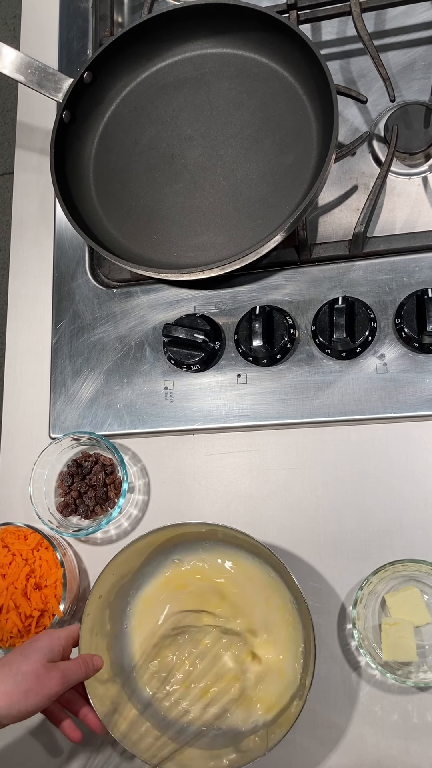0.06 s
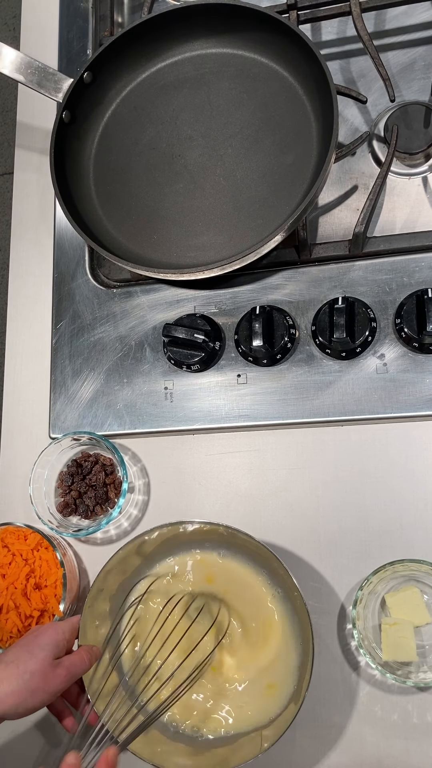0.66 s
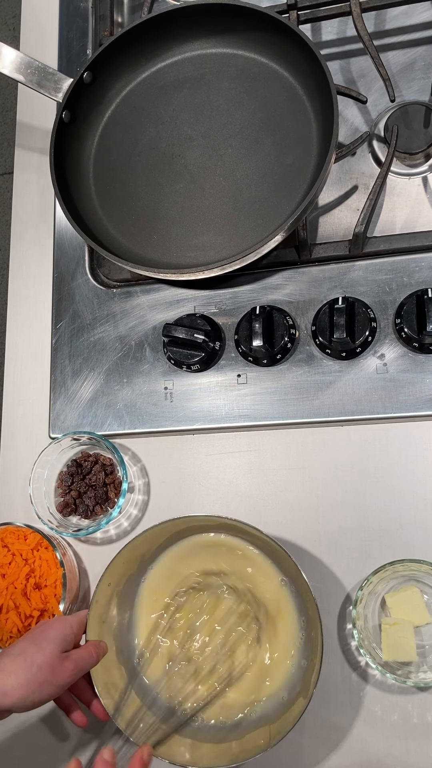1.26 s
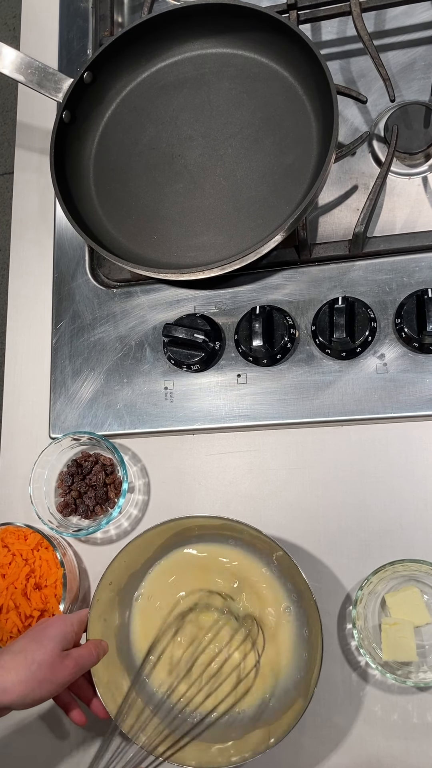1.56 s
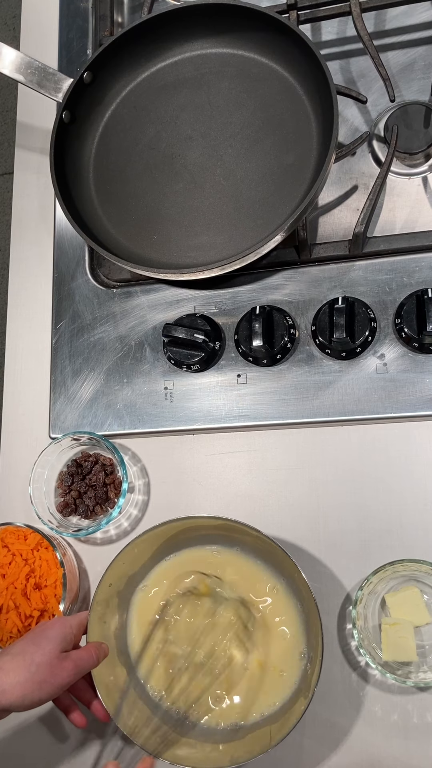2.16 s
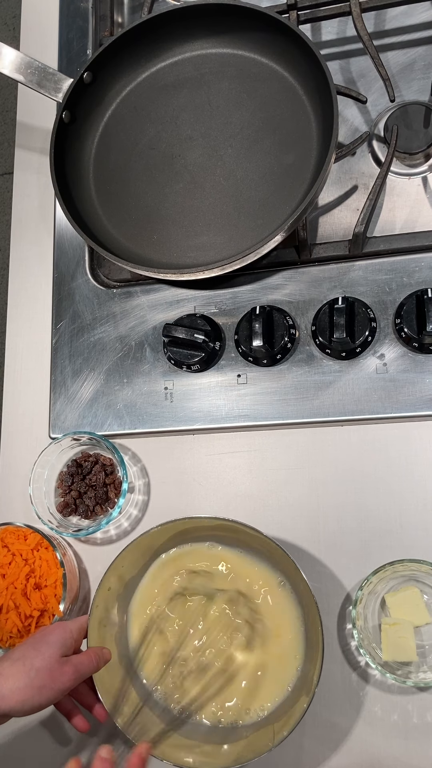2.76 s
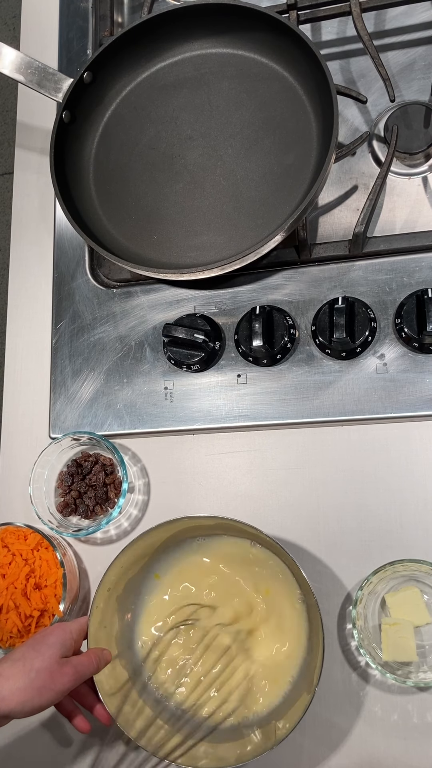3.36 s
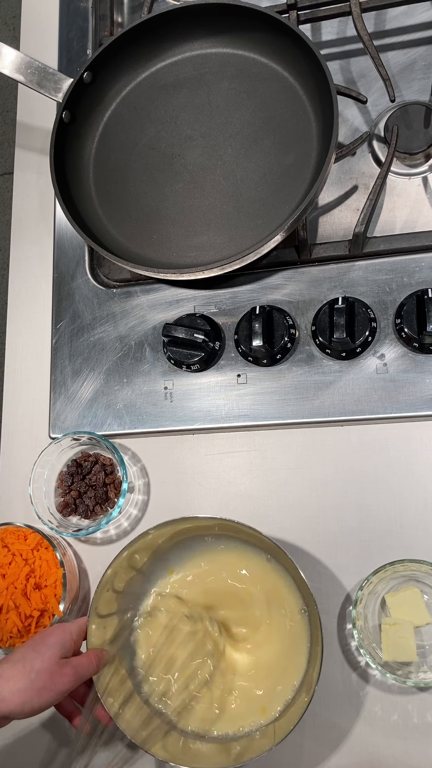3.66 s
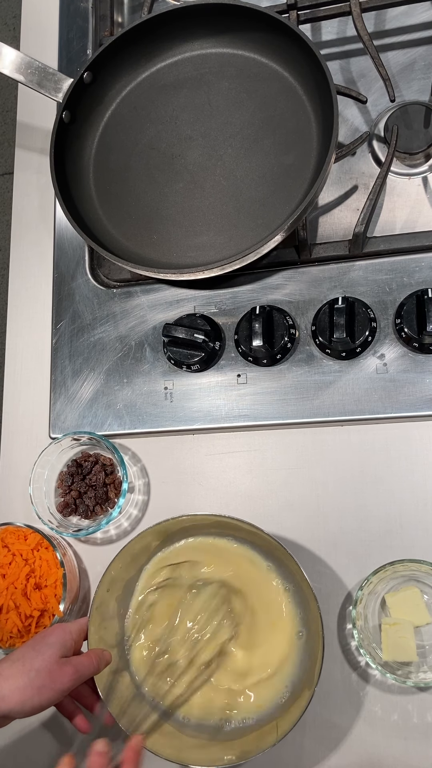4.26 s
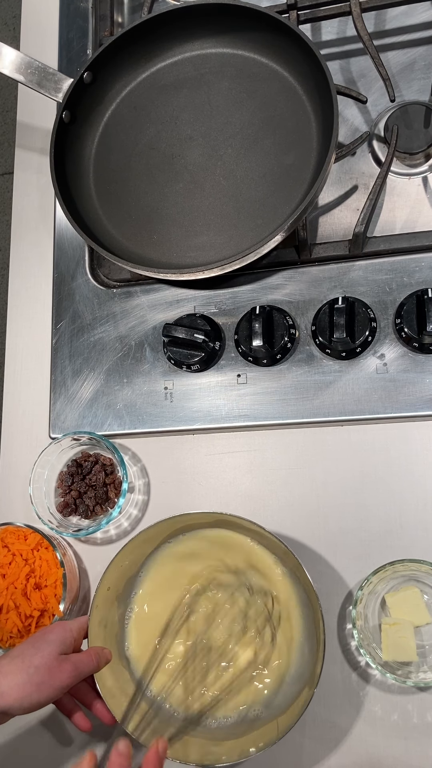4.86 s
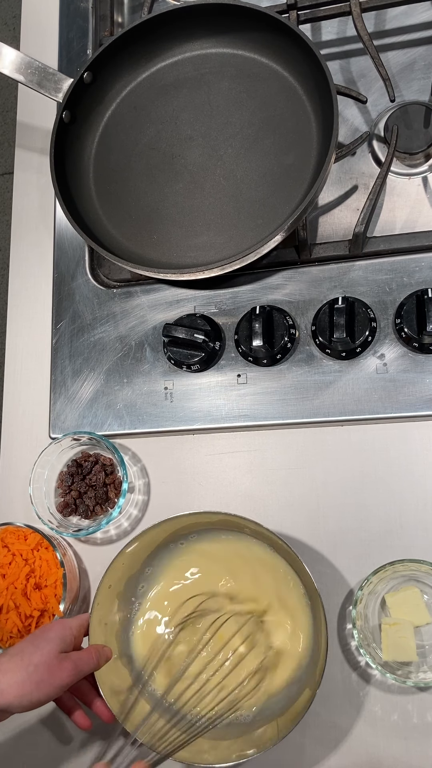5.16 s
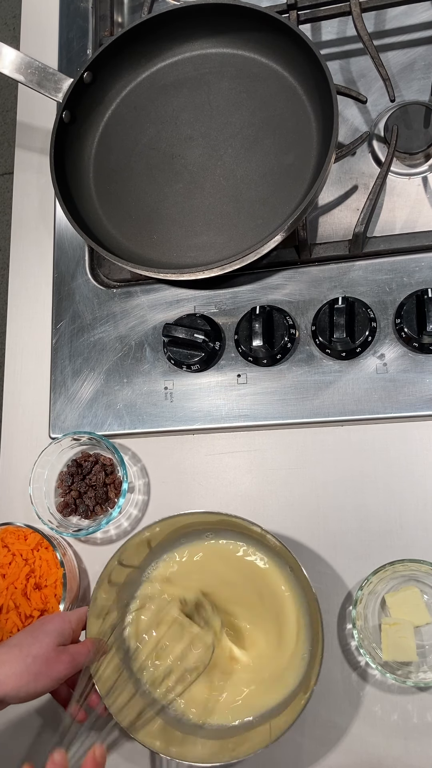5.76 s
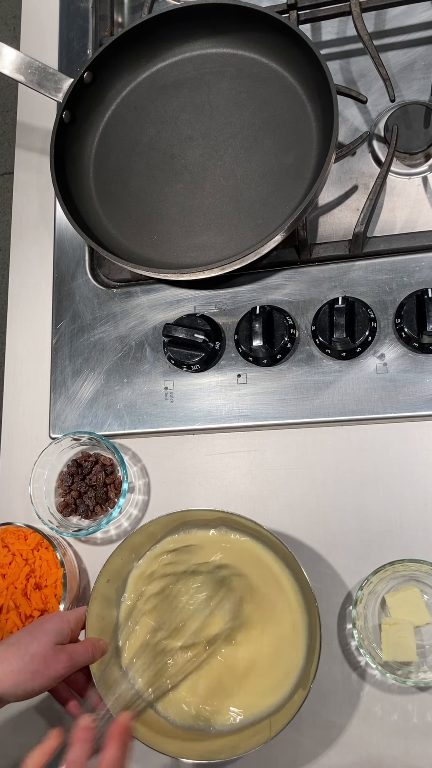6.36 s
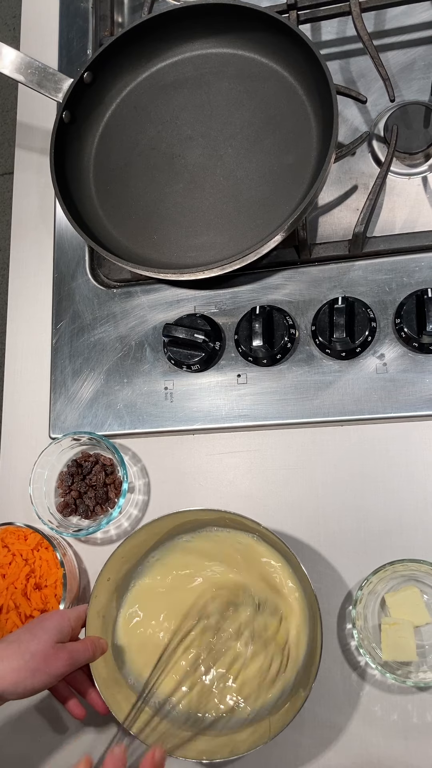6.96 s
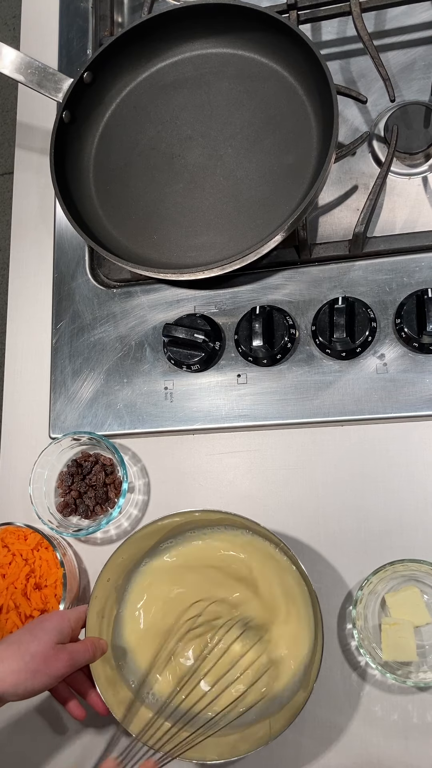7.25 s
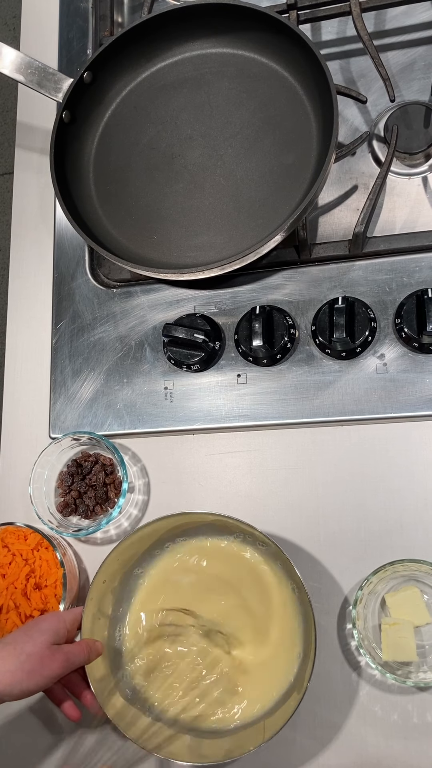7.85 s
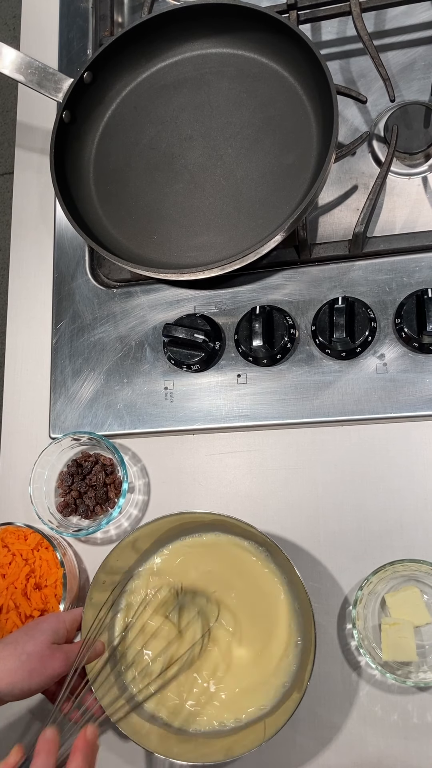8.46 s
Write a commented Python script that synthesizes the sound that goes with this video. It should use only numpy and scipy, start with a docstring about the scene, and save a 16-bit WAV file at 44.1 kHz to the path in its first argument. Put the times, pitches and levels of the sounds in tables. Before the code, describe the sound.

Whisk wires clatter rhythmically against a glass bowl as batter sloshes and bubbles, easing into lighter taps, then beating harder.

```python
"""A wire whisk in runny batter, in a glass bowl on a kitchen counter, close under a phone's two microphones.
Over a low room rumble the hand starts stirring, about four turns a second. On each turn the wires scrape
through the batter, which fizzes, gulps and bubbles, the bowl sings softly, and the wires clatter across
the glass. From about 1.5 s the whisk only taps the wall and the glass rings clear. Near 2.9 s it stirs
again, and from 5.3 s to the end it beats harder, squeezing chirps of air out of the batter."""
import sys
import numpy as np
from scipy import signal
from scipy.fft import rfft, irfft, next_fast_len
from scipy.io import wavfile
from scipy.ndimage import uniform_filter1d

SR = 44100
rng = np.random.default_rng(int(sys.argv[2]) if len(sys.argv) > 2 else 0)


def output_pcm(signal):
    """Save a mono or channel-first signal as 16-bit PCM at the path in sys.argv[1].

    Samples are clipped to [-1, 1] before scaling.
    """
    pcm = np.clip(np.atleast_2d(signal).T, -1, 1) * 32767
    wavfile.write(sys.argv[1], SR, np.round(pcm).astype(np.int16))


N = 379260
TIME = np.arange(N) / SR
TURN_S = .265  # the usual length of a turn
TAP_FROM_S, STIR_FROM_S, BEAT_FROM_S = 1.45, 2.86, 5.28  # where the hand changes its motion
TAPPING = (TIME > TAP_FROM_S) & (TIME < STIR_FROM_S)

# Levels in the tables are relative: each source adds its own gain.
# Spectra, from the room in to the wires. Each row: frequency in Hz, level in dB.
RUMBLE_SPECTRUM = [(20, -28), (33, -40), (45, -1.5), (65, 2), (82, 1), (140, 2), (165, -11.5), (235, -5.5),
                   (280, -11), (400, -14), (500, -22), (630, -18.5), (1100, -35), (5000, -62)]
RUMBLE_TREBLE = [(8000, -58), (12000, -70)]
ROOM_SPECTRUM = [(100, -40), (300, 13), (600, 7.5), (1500, 22), (2800, 15.5), (4100, 12.5), (5300, 3.5),
                 (7000, 5.5), (10000, 8.5), (12000, -45), (15000, -8)]  # the kitchen's reflections
SLOSH_SPECTRUM = [(50, -29), (100, -5), (140, 5.5), (170, 0.5), (230, 4), (290, -9), (400, -14), (520, -19),
                  (1200, -32.5)]  # heaving batter
FIZZ_SPECTRUM = [(100, -2), (240, 0), (480, -9), (900, -1.5), (1300, -24.5), (1750, -14), (2200, -20),
                 (2800, -15), (4000, -3.5), (7000, 1.5)]  # batter parted by the wires
FIZZ_TREBLE = [(10000, -12), (12000, -30)]
SNAP_SPECTRUM = [(700, -21), (1500, -4.5), (4200, 7), (7000, -1)]  # a bubble's film tearing
SING_SPECTRUM = [(650, -59), (800, -1.5), (880, -2), (950, -4), (1150, -49)]  # the bowl's singing mode, rubbed unevenly
KNOCK_SPECTRUM = [(60, 9.5), (200, 9), (350, -8), (500, -34), (630, 5), (760, 6), (900, 10.5), (1150, 1.5),
                  (1450, 1), (1750, -30), (2100, -12.5), (2800, -8), (5000, -6.5)]  # the struck bowl
RUB_SPECTRUM = [(1500, -40), (2700, -33), (3300, 8), (3650, 4.5), (4050, -22), (4700, 4), (5500, -14)]  # wires stirred along the glass
WIRE_SPECTRUM = [(1200, -72), (2700, -31.5), (3500, -20), (4400, -14.5), (4900, -3), (5500, -6.5),
                 (7100, -6.5), (8000, 2), (10000, 0), (11000, -0.5)]  # wires struck and scraped
WIRE_TREBLE = [(11900, -23), (12700, -7), (13400, -6.5), (14000, -9.5), (15700, -11)]
# How far the left microphone leads the right. Each row: frequency in Hz, phase in radians.
MIC_PHASE_LEAD = [(0, 0), (300, -.2), (700, -1.2), (1100, -.7), (1400, .3), (1800, .5), (2600, 2),
                  (4000, 1.6), (4900, 3.1), (5450, 3.2), (8600, 6.25), (11900, 9.43), (14600, 12.5),
                  (16000, 12.7)]

# Drag of the wires from one hit to the next. Each row: share of the turn from 0 to 1, level in dB.
STIR_DRAG = [(0, -33), (.4, -41), (.7, -34.5), (1, -31.5)]  # slack in the middle of the bowl, then climbing the wall
TAP_DRAG = [(0, -45), (.38, -35), (.78, -61), (1, -61)]  # a dip into the batter, then through the air
BEAT_DRAG = [(0, -29.5), (.22, -37), (0.497, -38), (0.699, -44), (1.001, -29)]  # ploughing on, then a brief lift before the next hit

# Air pockets opening behind the whisk. Each row: start in seconds, final pitch in Hz, level in dB.
AIR_POCKETS = [(0.197, 240, -39), (0.409, 253, -41), (0.418, 201, -34.5), (1.229, 237.6, -37),
               (1.4397, 181, -34.5), (1.466, 179, -42), (3.731, 240, -37.5), (4.06, 247, -35),
               (4.785, 223, -35.5), (6.865, 201, -35), (6.9486, 227, -30.5), (7.469, 232, -31.5),
               (7.7825, 215, -28), (8.208, 242, -35.5), (8.585, 242, -43)]
# The loudest bubbles. Each row: start in seconds, pitch in Hz, level in dB, life in seconds,
# rise in octaves per second.
BIG_BUBBLES = [(.818, 1480, -46.5, 0.0046, 24), (.946, 2060, -54, .004, -1), (4.559, 3800, -50, .003, 4),
               (4.573, 1253, -45.5, 0.0091, -1.5), (4.861, 3940, -39.5, 0.0024, 12),
               (5.009, 3430, -34.5, 0.0017, 12), (5.304, 2056, -35.5, 0.0039, 8.5),
               (5.499, 3720, -43.5, 0.0027, 3), (5.566, 1970, -39.5, 0.0037, 19),
               (5.678, 2190, -34.5, 0.0015, 14), (5.9, 3380, -31, 0.0016, 16),
               (6.401, 2133, -45, 0.002, 11), (6.439, 1840, -47, 0.0038, 0.5),
               (6.523, 3660, -32.5, 0.0015, 3), (6.741, 3380, -50, 0.0016, 2),
               (6.769, 3257, -43, 0.0019, 2), (6.9393, 3370, -32, .0014, 8),
               (7.013, 1520, -40.5, 0.0045, 18), (7.194, 3820, -39, 0.0019, 8),
               (7.475, 3280, -32, 0.0016, 6), (7.545, 2030, -40, 0.0023, 10),
               (7.561, 2030, -28, 0.0013, 32), (7.565, 1140, -37.5, 0.0046, 7),
               (8.122, 3200, -42, 0.0012, 2), (8.562, 3700, -44, 0.0013, 2)]
# Furrows closing in the batter. Each row: start and length in seconds, first and last pitch in Hz,
# level of a bubble in dB.
FURROWS = [(0.14, .025, 1345, 1890, -61), (0.782, .06, 890, 2260, -50), (1.143, 0.027, 1190, 1960, -55),
           (5.251, 0.045, 836, 2100, -46.5), (5.534, 0.033, 1400, 1986, -53),
           (6.073, 0.032, 1030, 1430, -45), (6.395, .015, 2300, 3120, -46.5),
           (7.113, 0.031, 920, 1539, -46), (7.343, .012, 1770, 2230, -51), (7.386, .012, 1930, 3330, -43),
           (7.558, 0.016, 1430, 3150, -46), (7.612, 0.023, 1920, 2290, -47)]

# Turns in which the wires catch the glass and it sings out. Each row: crest in seconds, level in dB,
# pitch in Hz, half length in seconds.
BOWL_NOTES = [(0.03, -41, 880, 0.024), (1.078, -45.5, 883, 0.028), (3.09, -59, 870, 0.018),
              (3.588, -52, 888, 0.038), (4.396, -31, 890, 0.011), (4.646, -44.5, 867, 0.022),
              (4.933, -44, 889, 0.035), (5.421, -43, 899, 0.0086), (5.7, -37, 883, 0.019),
              (6.478, -45, 896, 0.022), (6.738, -50, 890, 0.031), (7.266, -52, 894, 0.029),
              (7.538, -32, 867, 0.0071), (7.826, -49, 904, 0.025)]
# Resonances. Each row: frequency in Hz, level in dB, time to fall 60 dB in seconds.
TAPPED_GLASS_MODES = [(815, -2, .07), (885, 2, .09), (975, 1, .06), (1420, -8, .06), (1900, -9, .07),
                      (3900, -10, .06), (4400, -11, .06)]  # the wall tapped above the batter
WIRE_AND_BOWL_MODES = [(647, -20.5, 0.15), (818, -19.5, 0.092), (1420, -20.5, 0.28), (1890, -43, 0.15),
                       (2100, -21, 0.21), (3317, -13.5, 0.052), (3990, -8, .05), (6350, -5.5, .06),
                       (7210, 1, 0.11), (7740, 1, 0.22), (8070, 4.5, 0.21), (8370, -2, 0.19),
                       (8590, 4, 0.13), (9030, 3.5, 0.15), (9380, -3.5, 0.24), (9660, 1, 0.22),
                       (9380, -1, 0.084), (9800, 3, .14)]  # both ringing on after a contact
CLACK_MODES = [(617, -9.5, 0.052), (882, -2, 0.044), (1420, -9, 0.036), (1907, -11.5, 0.043),
               (3310, -0.5, 0.029), (3890, -7, 0.032), (4400, -6, 0.035), (5000, -8, 0.064)]  # the leading wire on the glass
# The wires' lower resonances, heard as wet ticks. Each row: frequency in Hz, level in dB.
TICK_MODES = [(1500, -4), (2150, -18), (3350, 1), (3900, 2), (4100, -11), (4500, -11), (4950, 14.5),
              (6300, 13)]

# A wire lands squarely on the glass. Each row: start in seconds, level in dB, pitch in Hz.
WIRE_CLINKS = [(0.176, -29, 3980), (0.4085, -26.5, 3940), (0.6776, -31, 3800), (0.918, -29.5, 3850),
               (2.4676, -30.5, 4050), (3.2066, -37, 4056), (3.464, -33, 3800), (3.713, -33, 4050),
               (3.9838, -43, 3900), (4.229, -32, 3750), (4.2444, -27, 3920), (4.4912, -29.5, 3350),
               (4.5031, -29, 4040), (4.5121, -29.5, 3890), (4.7846, -31, 3560), (6.6021, -30, 4050),
               (7.669, -31, 4300)]
# The wires bite and skid. Each row: middle in seconds, level in dB, half length in seconds.
WIRE_SKIDS = [(0.345, -35.5, .015), (0.601, -36, .028), (0.663, -32, .011), (0.868, -29, .01),
              (0.903, -32, .01), (1.069, -35, .018), (1.162, -30, .01), (1.301, -36, .006),
              (2.334, -34.5, .014), (3.074, -38, .009), (3.366, -32, .008), (3.641, -31, .008),
              (3.68, -34, .02), (3.833, -39, .012), (4.171, -37, .012), (4.434, -38, .014),
              (5.135, -37, .014), (5.201, -35, .02), (5.427, -36.5, .009), (5.501, -34, .006),
              (5.657, -37.5, .01), (5.952, -38, .015), (6.205, -36.5, .016), (6.312, -33, .008),
              (7.099, -31, .016), (7.191, -33, 0.0055), (7.454, -35, .012), (8.07, -36, .014)]
# One wire flicks the glass. Each row: start in seconds, level in dB, fade in seconds,
# the bowl's knock against that level in dB.
WIRE_FLICKS = [(0.097, -33.5, .002, -32), (0.1632, -22.5, .003, -28), (1.145, -26.5, .005, -18),
               (1.387, -29.5, .005, -31), (1.674, -18, .002, -10.5), (1.6791, -16, .0016, -22),
               (1.732, -27, .003, -28), (1.9143, -29, .002, -22), (2.6788, -22, .002, -33),
               (2.947, -30, .008, -9.5), (3.132, -28.5, .005, -39), (3.214, -25, 0.0017, -33),
               (3.243, -25, .003, -14), (3.616, -32.5, .003, -33), (3.903, -31, .004, -32),
               (3.934, -29, .004, -38), (4.393, -30, .006, -28), (4.504, -22.5, .003, -20),
               (4.513, -26, .002, -16), (5.2334, -23, .003, -24), (5.332, -31, .003, -5),
               (5.9, -31.5, .002, -25), (6.05, -26.5, .005, -35), (6.169, -32, .003, -22),
               (6.417, -29, .002, -11), (6.485, -31, .005, -14), (6.555, -26, .004, -17),
               (6.72, -31, .003, -15), (6.753, -33, .002, -25), (6.803, -31.5, .003, -9),
               (6.851, -27, .002, -30), (6.998, -29, .0012, -8), (7.06, -35, .002, -9),
               (7.1402, -24, .003, -12), (7.269, -30.5, .003, -8), (7.345, -25, .006, -9.5),
               (7.3905, -23, 0.0076, -20), (7.519, -32, .002, -8), (7.616, -23, .005, -13),
               (7.803, -31, .002, -24), (8.284, -30, .003, -13), (8.33, -26.5, .003, -27),
               (8.4813, -23.5, .003, -19)]
# The hit on the wall that ends each turn. Each row: time in seconds, level in dB, length of the clatter
# in seconds, the bowl's knock against the wires in dB, share of the first blow from 0 to 1,
# extra drag on the way there in dB, heave of the batter afterwards in dB.
WALL_HITS = [(0.1756, -24.5, 0.011, -18, 0.5, 0, -48), (0.4081, -22, 0.014, -12.5, 0.25, -1, -43),
             (0.6775, -21.5, 0.012, -13.5, 0.6, 0, -55), (0.9148, -20.5, 0.011, -20, 0.36, 1, -44),
             (1.1812, -23.5, 0.015, -23, 0.5, 0, -55), (1.438, -29.5, 0.0087, -41, 0.5, 0.5, -66),
             (1.6685, -20.5, 0.007, -21.5, 0.5, -24.5, -44), (1.8987, -23, 0.005, -19.5, 0.8, 0.5, -48),
             (2.0881, -21.5, 0.007, -33, 0.44, -14, -55), (2.2668, -21, 0.01, -20.5, 0.35, -2, -41),
             (2.4677, -20, 0.016, -21, 0.16, 1.5, -47), (2.6659, -18.5, 0.008, -25.5, 0.57, -1.5, -42),
             (2.8455, -26.5, 0.011, -17.5, 0.3, 1, -64), (3.2034, -20.5, 0.023, -15.5, 0.12, 0, -48),
             (3.4702, -23.5, 0.01, -11, 0.4, 1, -39), (3.7105, -16.5, 0.015, -18, 0.6, 1, -43),
             (3.982, -20.5, 0.027, -12, 0.25, 1, -37.5), (4.2302, -18.5, 0.027, -15.5, 0.3, 0, -44),
             (4.4911, -20.5, 0.022, -10.5, 0.2, -1, -38), (4.7826, -19, 0.02, -16, 0.18, -2.5, -49),
             (5.0334, -20.5, 0.032, -17, 0.3, -4, -43), (5.2751, -20, 0.024, -16, 0.17, 1.5, -44),
             (5.552, -20.5, 0.024, -30, 0.4, 0.5, -48), (5.8006, -20, 0.015, -17, 0.3, 0.5, -62),
             (6.063, -18.5, 0.029, -13.5, 0.1, 1, -48), (6.3323, -17.5, 0.019, -16, 0.3, 1, -46),
             (6.6002, -18.5, 0.02, -12.5, 0.19, -1, -49), (6.8574, -19, 0.021, -14, 0.26, 0, -39.5),
             (7.1246, -18.5, 0.013, -15.5, 0.6, 1, -39), (7.401, -19, 0.022, -14.5, 0.42, 1, -43),
             (7.669, -16, 0.022, -14.5, 0.3, 1, -42), (7.9432, -20, 0.017, -25, 0.25, -1, -60),
             (8.235, -26.5, 0.018, -24, 0.2, 0, -61), (8.4934, -23, 0.012, -13.5, 0.5, -1.5, -51)]


def undb(db):
    """Decibels to gain."""
    return 10 ** (np.asarray(db) / 20)


def unit(x):
    """Scale to an rms of one."""
    return x / np.sqrt(np.mean(x ** 2))


def add(track, s, sound):
    """Mix a sound into a track from time s on."""
    start = max(int(s * SR), 0)
    track[start:start + len(sound)] += sound[:N - start]


def colour(x, points):
    """Filter by a spectrum of (Hz, dB) points; white noise keeps its power."""
    hz, db = np.transpose(points)
    size = next_fast_len(x.shape[-1] + 4096)
    bins = np.maximum(np.fft.rfftfreq(size, 1 / SR), 1)
    gain = unit(undb(np.interp(np.log(bins), np.log(hz), db)))
    return irfft(rfft(x, size) * gain, size)[..., :x.shape[-1]]


def walk(rate):
    """Random levels held 1 / rate seconds and smoothed twice; rms one."""
    hold = int(SR / rate)
    steps = np.repeat(rng.standard_normal(N // hold + 1), hold)
    return unit(uniform_filter1d(uniform_filter1d(steps, hold), hold)[:N])


def pick(weights, chance):
    """Turn even chances from 0 to 1 into indices, each as likely as its weight."""
    return np.searchsorted(np.cumsum(weights) / np.sum(weights), chance)


def contacts(n, rate, scatter_db, fade_s):
    """Power of random tiny contacts of uneven size, each fading over fade_s; mean near one."""
    size = undb(scatter_db * np.clip(rng.standard_normal(n), -2, 2)) ** 2
    hits = (rng.random(n) < rate / SR) * size / np.mean(size) * SR / rate
    keep = np.exp(-1 / (fade_s * SR))
    return signal.lfilter([1 - keep], [1, -keep], hits)


def crackle(rate, scatter_db, fade_s, hiss):
    """Stick-slip grains over a smooth hiss; rms one."""
    return unit(np.sqrt(hiss + contacts(N, rate, scatter_db, fade_s)) * rng.standard_normal(N))


def burst(power, db):
    """Noise that follows a power envelope, with the energy of 10 ms at the given level."""
    noise = np.sqrt(power) * rng.standard_normal(len(power))
    return undb(db) * noise * np.sqrt(SR / 100 / np.sum(noise ** 2))


def blip(hz, life_s):
    """A pocket of air rings along a pitch track: quick swell, then decay."""
    age = TIME[:len(hz)] / life_s
    return np.sqrt(2) * age * np.exp(1 - age) * np.sin(2 * np.pi * np.cumsum(hz) / SR)


def damped_sine(t, hz, t60_s):
    """One struck mode, falling 60 dB in t60_s."""
    return undb(-60 * t / t60_s) * np.sin(2 * np.pi * hz * t)


def ring(force, modes):
    """A force sets a bank of modes ringing; their response has an energy of one."""
    response = sum(undb(db) * damped_sine(TIME[:SR // 2], hz, t60_s) for hz, db, t60_s in modes)
    return signal.fftconvolve(force, response / np.sqrt(np.sum(response ** 2)))[:N]


def rumble(level_db=-46.5, side_db=-18, waver_db=2.5, pan_db=3.5):
    """Room tone: a low, wavering rumble fills the kitchen, a little louder on the left."""
    mid, side = colour(rng.standard_normal((2, N)), RUMBLE_SPECTRUM + RUMBLE_TREBLE)
    sign = np.array([[1], [-1]])
    gain = undb(level_db + waver_db * walk(13) + sign * pan_db / 2)
    return gain * (mid + sign * undb(side_db) * side)


def kitchen(x, t60_s, gap_s, wet_db):
    """A short tail off counter, hob and cupboards, different at each microphone."""
    t, out = TIME[:SR // 2], 0
    angle = 2 * walk(10)  # two tails crossfade as the whisk moves
    for share in (np.cos(angle), np.sin(angle)):
        tail = rng.standard_normal((2, len(t))) * undb(-60 * t / t60_s) * (t > gap_s)
        tail = colour(tail / np.sqrt(np.sum(tail[0] ** 2)), ROOM_SPECTRUM)
        out = out + signal.fftconvolve((share * x)[None], tail, axes=1)[:, :N]
    return undb(wet_db) * out


def microphones(x):
    """Close above the bowl, the pair hears the direct sound with a phase gap that depends on pitch."""
    hz, lead = np.transpose(MIC_PHASE_LEAD)
    shift = np.exp(.5j * np.interp(np.fft.rfftfreq(N, 1 / SR), hz, lead))
    return irfft(rfft(x) * np.array([shift, shift.conj()]), N)


def turn_edges():
    """Times at which turns begin and end: every hit, and one usual turn before and after."""
    hits = np.array(WALL_HITS)[:, 0]
    return np.r_[hits[0] - TURN_S, hits, hits[-1] + TURN_S]


def drag(ease_s=.012, unsteady_db=1.6):
    """Drag of the wires in dB: every turn follows the hand's motion, pressed harder or softer."""
    edges = turn_edges()
    turn, share = np.divmod(np.interp(TIME, edges, np.arange(len(edges))), 1)
    shapes = (STIR_DRAG, TAP_DRAG, BEAT_DRAG)
    stir, tap, beat = (np.interp(share, *np.transpose(shape)) for shape in shapes)
    usual = np.select([TAPPING, TIME < BEAT_FROM_S], [tap, stir], beat)
    pressed = np.array([db for *_, db, _ in WALL_HITS]).take(turn.astype(int), mode="clip")
    return uniform_filter1d(usual + pressed, int(ease_s * SR)) + unsteady_db * walk(25)


def slosh(rest_db=-50.5, hit_rise_s=.026, gulp_rise_s=.011, gulp_db=-4.5, gain_db=-2):
    """The batter heaves: each hit and each gulp raises a wave that crests and settles."""
    pushes = [(s, db, hit_rise_s) for s, *_, db in WALL_HITS]
    pushes += [(s, db + gulp_db, gulp_rise_s) for s, _, db in AIR_POCKETS]
    power = np.full(N, undb(rest_db) ** 2)
    for s, db, rise_s in pushes:
        age = TIME[:SR // 3] / rise_s
        add(power, s, undb(db) ** 2 * age * np.exp(1 - age))
    churn = crackle(rate=60, scatter_db=.5, fade_s=.008, hiss=.34)
    return undb(gain_db) * np.sqrt(power) * colour(churn, SLOSH_SPECTRUM)


def fizz(drag_db, lifted_db=-46):
    """Batter fizzes on between strokes, swelling less than the drag; it settles as the whisk lifts out."""
    level_db = .48 * drag_db - 29 + .5 * np.minimum(drag_db - lifted_db, 0)
    grains = crackle(rate=170, scatter_db=5.5, fade_s=.0025, hiss=.1)
    return undb(level_db) * colour(grains, FIZZ_SPECTRUM + FIZZ_TREBLE)


def gulps(drop_hz=800, fall_s=.00281, attack_s=.0014, life_s=.021):
    """A pocket pops open behind the wires; as the cavity widens, its pitch drops to a low gulp."""
    out, t = np.zeros(N), TIME[:SR // 10]
    swell = np.sqrt(2) * (1 - np.exp(-t / attack_s)) * np.exp(-(t / life_s) ** 2)
    drop = drop_hz * np.exp(-(t / fall_s) ** 4)
    for s, hz, db in AIR_POCKETS:
        add(out, s, undb(db) * swell * np.sin(2 * np.pi * np.cumsum(hz + drop) / SR))
    return out


def bubbles(drag_db, count=260, small_db=-21.5, low_hz=1100, octaves=1.9, life_s=.0012, rise=12):
    """Bubbles rise in pitch near the surface and quiver in the churn; the drag tears off small ones."""
    out, t = np.zeros(N), TIME[:SR // 12]
    wobble = 1 + .04 * walk(600)
    when, pitch, size, slow = rng.random((count, 4)).T
    starts = pick(undb(drag_db), when)
    levels = drag_db[starts] + small_db + 6 * (2 * size - 1)
    small = zip(starts / SR, low_hz * 2 ** (octaves * pitch), levels, life_s * (.5 + slow), rise * slow)
    for s, hz, db, life, glide in list(BIG_BUBBLES) + list(small):
        quiver = wobble.take(int(s * SR) + np.arange(len(t)), mode="wrap")
        add(out, s, undb(db) * blip(hz * quiver * 2 ** (glide * t), life))
    roughness = 1 + .4 * walk(450)
    return out * roughness


def slurps(count=9, life_s=.0015, octaves_per_s=12, spread=.14, scatter_db=4):
    """As a furrow closes, its bubbles get smaller and so higher, one after another."""
    out, t = np.zeros(N), TIME[:SR // 30]
    for s, length_s, first_hz, last_hz, db in FURROWS:
        for k, (late, bend, size) in enumerate(rng.random((count, 3))):
            along = (k + late) / count
            hz = first_hz * (last_hz / first_hz) ** along * (1 + spread * (2 * bend - 1))
            bubble = blip(hz * 2 ** (octaves_per_s * t), life_s)
            add(out, s + along * length_s, undb(db + scatter_db * (2 * size - 1)) * bubble)
    return out


def squelches(count=12, gain_db=-47.5, length_s=.055, low_hz=1000, octaves=1.49, octaves_per_s=26):
    """Each hard beat squeezes air out of the batter in a spray of small rising chirps."""
    out, t = np.zeros(N), TIME[:SR // 40]
    beats = [s for s, *_ in WALL_HITS if s > BEAT_FROM_S - TURN_S / 2]
    for s in beats:
        for late, pitch, size in rng.random((count, 3)):
            chirp = blip(low_hz * 2 ** (octaves * pitch + octaves_per_s * t), life_s=.0016)
            add(out, s + late * length_s, undb(gain_db + 6 * (2 * size - 2.5)) * chirp)
    return out


def snaps(fade_s=.0029, gain_db=-11):
    """The film of each big bubble tears with a short wet snap."""
    out = np.zeros(N)
    for s, _, db, life_s, _ in BIG_BUBBLES:
        add(out, s + life_s / 2, burst(np.exp(-TIME[:SR // 50] / fade_s), db + gain_db))
    return colour(out, SNAP_SPECTRUM)


def singing(usual_hz=875, usual_db=-54.5, usual_half_s=.027, arch=.01954, rub_db=-52.5, rub_half_s=.052):
    """The rubbed bowl hums once a turn, except in the tapping: a rough band with a note at its crest."""
    notes, rub = np.zeros(N), np.zeros(N)
    wobble = 1 + .014 * walk(160)
    edges = turn_edges()
    for start, end in zip(edges[:-2], edges[1:-1]):
        usual = ((start + end) / 2, usual_db, usual_hz, usual_half_s)
        s, db, hz, half_s = next((row for row in BOWL_NOTES if start < row[0] < end), usual)
        if TAP_FROM_S < s < STIR_FROM_S:
            continue
        near = np.abs(TIME - s) < TURN_S / 2
        away = ((TIME[near] - s) / half_s) ** 2
        pitch = hz * wobble[near] * (1 + arch * (.5 - np.minimum(away, 2)))  # arches up at the crest
        notes[near] += undb(db) * np.sqrt(2) * np.exp(-away) * np.sin(2 * np.pi * np.cumsum(pitch) / SR)
        rub[near] += np.exp(-((TIME[near] - s) / rub_half_s) ** 2)
    flutter = 1 + .22 * walk(130)
    return notes * flutter + undb(rub_db) * rub * colour(rng.standard_normal(N), SING_SPECTRUM)


def knocks(hit_force, flick_force, scrape):
    """The bowl knocks under the wires; in the tapping they leave the wall at once, so it rings clear."""
    knock = colour(hit_force + flick_force + undb(-36) * scrape, KNOCK_SPECTRUM)
    clear_ring = ring(TAPPING * hit_force, TAPPED_GLASS_MODES)
    return undb(-3.5 - 6 * TAPPING) * knock + undb(1) * clear_ring


def rubbing(drag_db, gain_db=-20, tap_db=-6):
    """Until the hand beats harder, the wires ride on the glass and chatter, only lightly between taps."""
    on_glass = np.clip((BEAT_FROM_S - TIME) / TURN_S, 0, 1)
    chatter = colour(crackle(rate=160, scatter_db=12.5, fade_s=.0032, hiss=.032), RUB_SPECTRUM)
    return on_glass * undb(drag_db + gain_db + tap_db * TAPPING) * chatter


def scraping(drag_db, drag_gain_db=-3, skid_gain_db=-.68):
    """Stick-slip force of the sliding wires: it follows the drag, and swells and lets go in each skid."""
    power = undb(drag_db + drag_gain_db) ** 2
    for s, db, half_s in WIRE_SKIDS:
        near = np.abs(TIME - s) < TURN_S / 2
        power[near] += undb(db + skid_gain_db) ** 2 * np.exp(-2 * ((TIME[near] - s) / half_s) ** 2)
    return np.sqrt(power) * crackle(rate=240, scatter_db=4.5, fade_s=.0016, hiss=.2)


def pings(force, count, t60_s, detune):
    """Each contact favours one mode, at a pitch that depends on where the wire is pressed."""
    out, t = np.zeros(N), TIME[:SR // 14]
    hz, db, _ = np.transpose(WIRE_AND_BOWL_MODES)
    effort = np.sqrt(uniform_filter1d(force ** 2, size=64) + 1e-12)
    when, which, bend = rng.random((count, 3)).T
    modes = (which * len(hz)).astype(int)
    pitches = hz[modes] * (1 + detune * (2 * bend - 1))
    # harder rubbing gives both more pings and stronger ones
    for i, gain, pitch in zip(pick(effort, when), undb(db[modes]), pitches):
        add(out, i / SR, np.sqrt(effort[i]) * gain * damped_sine(t, pitch, t60_s))
    return unit(out) * np.std(force)


def ticks(force, count=340, t60_s=.043, detune=.07, gain_db=-19):
    """Wires jostle each other and the glass; the batter damps each tick within moments."""
    out, t = np.zeros(N), TIME[:SR // 25]
    effort = np.sqrt(uniform_filter1d(force ** 2, size=256) + 1e-12)
    when, which, bend, size = rng.random((count, 4)).T
    hz, db = np.array(TICK_MODES)[(which * len(TICK_MODES)).astype(int)].T
    pitches = hz * (1 + detune * (2 * bend - 1))
    gains = undb(db + gain_db + 14 * (size ** 2 - .5))
    for i, gain, pitch in zip(pick(np.sqrt(effort), when), gains, pitches):
        add(out, i / SR, effort[i] * gain * damped_sine(t, pitch, t60_s))
    return out


def clinks(t60_s=.058, gain_db=-1):
    """A squarely struck wire rings at one low resonance until the batter damps it."""
    out = np.zeros(N)
    for s, db, hz in WIRE_CLINKS:
        add(out, s, undb(db + gain_db) * damped_sine(TIME[:SR // 10], hz, t60_s))
    return out


def clacks(gain_db=-15, late_s=.000999, detune=.011, scatter_db=5.5):
    """The first blow of each hit rings a few short modes, a little differently at each spot on the wall."""
    out, t = np.zeros(N), TIME[:SR // 10]
    for s, db, _, _, share, *_ in WALL_HITS:
        blow = undb(db + gain_db) * np.sqrt(share)
        spot = 2 * rng.random((len(CLACK_MODES), 2)) - 1
        for (hz, mode_db, t60_s), (bend, size) in zip(CLACK_MODES, spot):
            tone = damped_sine(t, hz * (1 + detune * bend), t60_s)
            add(out, s + late_s, blow * undb(mode_db + scatter_db * size) * tone)
    return out


def flicks(gain_db=-1):
    """Single wires slip and snap back on the glass; returns the force on the wires and on the bowl."""
    wires, bowl = np.zeros(N), np.zeros(N)
    for s, db, fade_s, knock_db in WIRE_FLICKS:
        force = burst(np.exp(-TIME[:SR // 20] / fade_s), db + gain_db)
        add(wires, s, force)
        add(bowl, s, force * undb(knock_db))
    return wires, bowl


def wall_hits(blow_s=.001, blow_db=1.5, hiss=.1, swell_share=.04):
    """The leading wire strikes and the rest chatter after it; returns the force on wires and on bowl."""
    wires, bowl, t = np.zeros(N), np.zeros(N), TIME[:SR // 8]
    for s, db, length_s, knock_db, share, *_ in WALL_HITS:
        sweep = (1 - np.exp(-t / (swell_share * length_s))) * np.exp(-(t / length_s) ** 2)
        chatter = burst(sweep * (hiss + contacts(len(t), rate=340, scatter_db=4, fade_s=.0008)), db)
        blow = burst(t * np.exp(-t / blow_s), db + blow_db)
        force = np.sqrt(share) * blow + np.sqrt(1 - share) * chatter
        add(wires, s, force)
        add(bowl, s, force * undb(knock_db))
    return wires, bowl


def whisk(blows, scrape):
    """The wires clatter and ring: a blow damps them against the wall, while sliding lets them ring on."""
    force = blows + scrape
    clatter = undb(-2) * colour(force, WIRE_SPECTRUM + WIRE_TREBLE)
    damped_pings = undb(-8.5) * pings(force, count=4000, t60_s=.03, detune=.02)
    free_pings = undb(-4.5) * pings(scrape, count=2000, t60_s=.07, detune=.012)
    ringing = undb(-13.5) * ring(force, WIRE_AND_BOWL_MODES)
    return clatter + damped_pings + free_pings + ticks(force) + clacks() + clinks() + ringing


def scene():
    """Wires, glass and batter close under the microphones, with the kitchen behind them."""
    drag_db = drag()
    hit_on_wires, hit_on_bowl = wall_hits()
    flick_on_wires, flick_on_bowl = flicks()
    scrape = scraping(drag_db)
    wires = whisk(hit_on_wires + flick_on_wires, scrape)
    batter = fizz(drag_db) + slosh() + gulps()
    glass = knocks(hit_on_bowl, flick_on_bowl, scrape) + singing()
    bowl = wires + batter + glass + rubbing(drag_db)
    froth = bubbles(drag_db) + slurps() + squelches() + snaps()
    bowl_room = kitchen(bowl, t60_s=.097, gap_s=.0031, wet_db=-8)
    # bubbles burst deep in the bowl, which sends them up to the phone more than into the room
    froth_room = kitchen(froth, t60_s=.092, gap_s=.0019, wet_db=-12.5)
    return microphones(bowl + froth) + bowl_room + froth_room + rumble()


def record(dry, low_hz=38, top_hz=15750):
    """The phone cuts the deepest bass and the highest treble."""
    low_cut = signal.butter(6, low_hz, "highpass", fs=SR, output="sos")
    high_cut = signal.ellip(10, .1, 70, top_hz, fs=SR, output="sos")
    return signal.sosfilt(high_cut, signal.sosfilt(low_cut, dry))


dry = scene()
out = record(dry)
output_pcm(out)
```